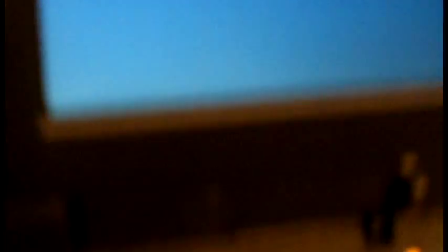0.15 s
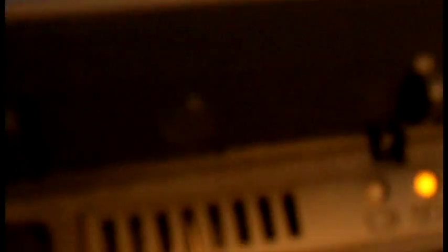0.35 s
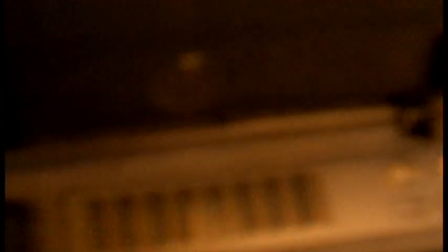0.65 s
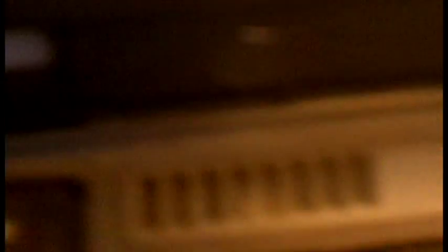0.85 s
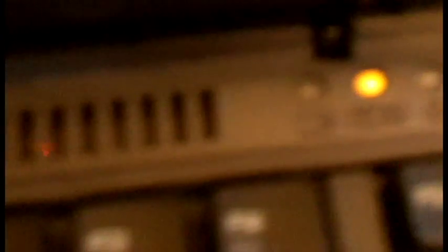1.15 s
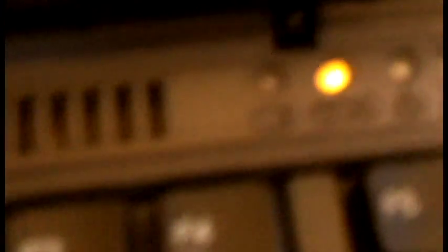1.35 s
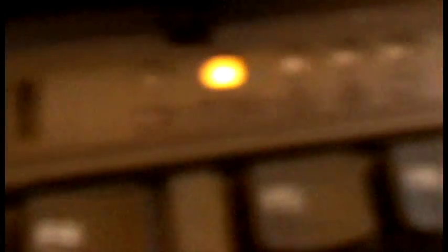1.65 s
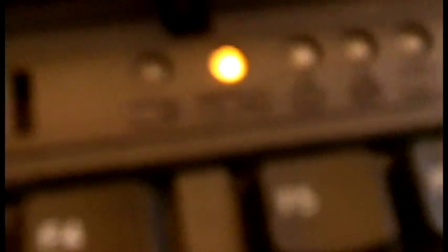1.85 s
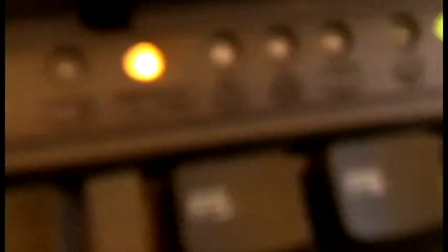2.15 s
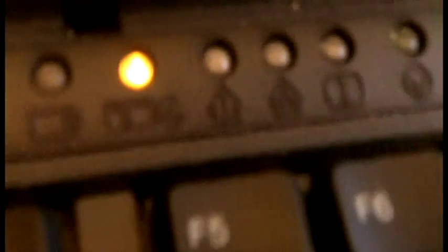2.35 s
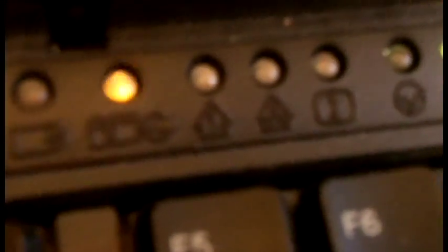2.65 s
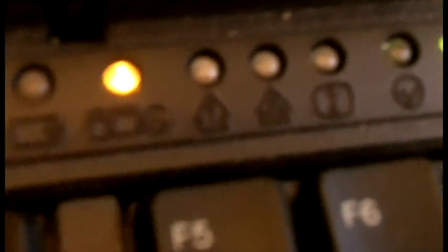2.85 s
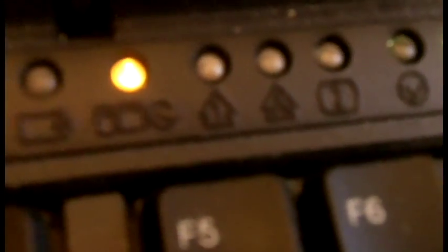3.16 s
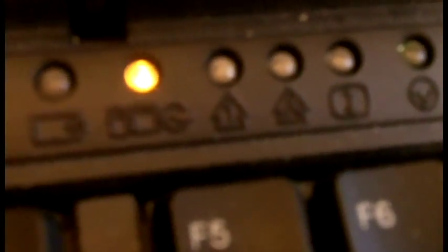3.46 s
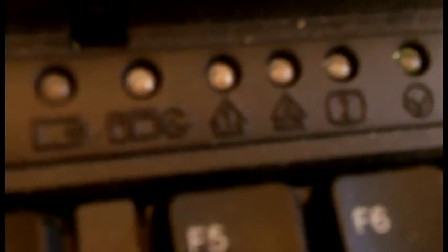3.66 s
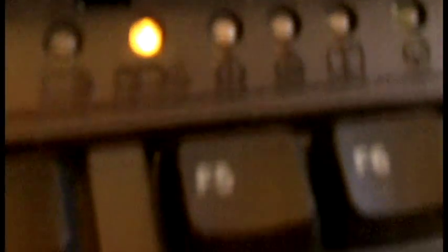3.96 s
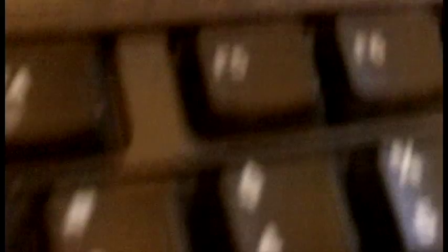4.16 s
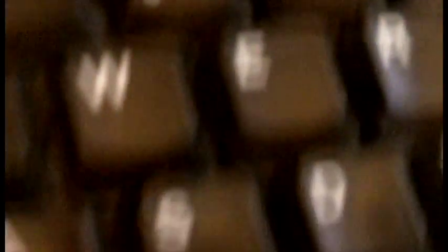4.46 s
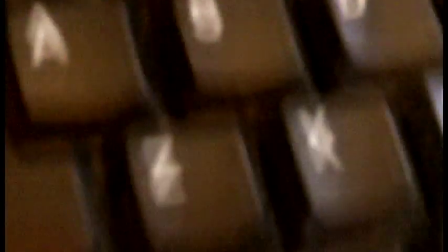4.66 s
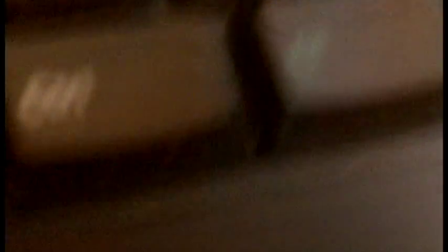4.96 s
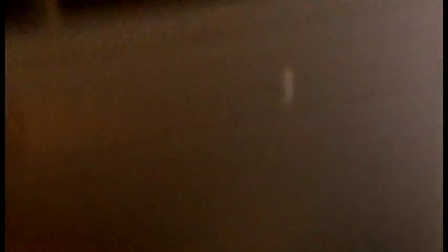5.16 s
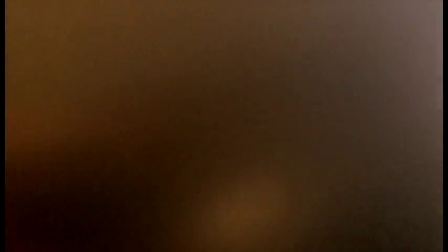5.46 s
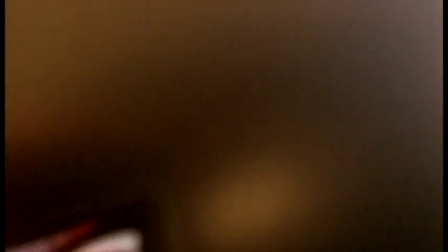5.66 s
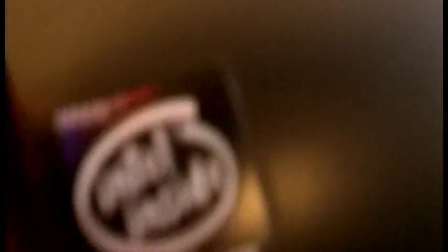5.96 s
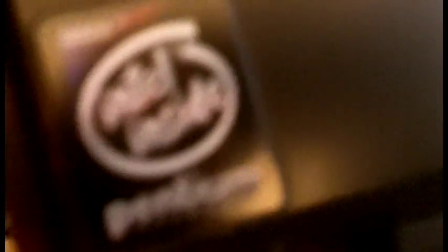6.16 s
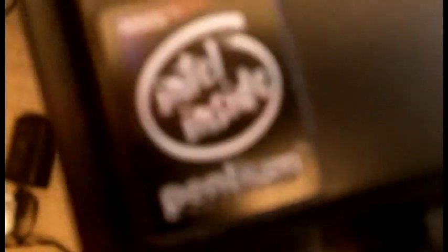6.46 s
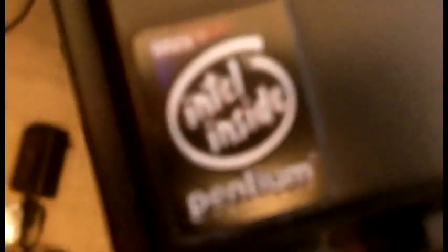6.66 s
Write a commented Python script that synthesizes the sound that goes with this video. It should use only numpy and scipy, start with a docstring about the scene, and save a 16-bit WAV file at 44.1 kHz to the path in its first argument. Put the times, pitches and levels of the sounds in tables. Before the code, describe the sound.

Close to a running laptop, a faint drive purrs and crackles over a steady low hum, interrupted by hand rubs and hard clicks of a plastic shell.

```python
"""Low handling rumble and a steady hum, as a small camera is carried close over a running laptop.
Its hard drive whirs on shaped noise and narrow motor lines, and seeks in bursts of quick irregular strokes:
jerks and a rough buzz that ring the cover. The hand rubs as gritty noise and snaps the camera's plastic shell
with short bursts into its resonances; faint high blips come from the electronics.
One microphone: its port cancels a narrow band, and its gain control ducks when the level passes a ceiling."""
import sys
import numpy as np
from scipy import signal
from scipy.fft import rfft, irfft, next_fast_len
from scipy.io import wavfile
from scipy.ndimage import uniform_filter1d, minimum_filter1d, map_coordinates

SR = 44100
rng = np.random.default_rng(int(sys.argv[2]) if len(sys.argv) > 2 else 0)


def dump(signal):
    """Clip the signal to [-1, 1] and save it as 16-bit WAV at the path in sys.argv[1]."""
    limited = np.clip(np.atleast_2d(signal).T, -1, 1)
    pcm = np.round(limited * 32767).astype(np.int16)
    wavfile.write(sys.argv[1], SR, pcm)


N = 300321

# The drive as it reaches the moving camera. Each row: time in seconds, whir level in dB, hum level in dB,
# stroke buzz level in dB, cover ring over the buzz in dB.
DRIVE_LEVELS = [(0, -78.5, -62.5, -80, 18), (.5, -76.5, -63.5, -78.5, 17.5), (.95, -74.5, -66, -70, -3),
                (1.4, -69.5, -61.5, -68.5, 5), (1.7, -68, -60.5, -65, 7), (2.35, -67.5, -58, -65, 6.5),
                (2.8, -68, -57.5, -66, 7), (3.3, -66, -57.5, -63.5, 9.5), (3.9, -66, -59.5, -65, 12),
                (4.6, -71, -61, -66, 4), (5.3, -71, -60.5, -67.5, 9), (5.7, -73, -59.5, -71, 11.5),
                (6.81, -74.5, -60, -71.5, 10)]


def amp(db):
    """Decibels to gain."""
    return 10 ** (np.asarray(db) / 20)


def unit(x):
    """x at rms 1."""
    return x / np.sqrt(np.mean(x ** 2) + 1e-20)


def curves(rows, outside=None):
    """One value per sample for each column after the time."""
    s, *cols = np.transpose(rows)
    return [np.interp(np.arange(N) / SR, s, c, outside, outside) for c in cols]


def wobble(rate):
    """A smooth random curve, rate knots a second."""
    knots = rng.standard_normal(int(N * rate / SR) + 4)
    return map_coordinates(knots, [np.arange(N) * rate / SR])


def filtered(x, response):
    """x times a complex response of frequency."""
    m = next_fast_len(N + SR // 2)
    return irfft(rfft(x, m) * response(np.fft.rfftfreq(m, 1 / SR)), m)[..., :N]


def noise(spectrum, grain_db=0.0):
    """Noise of rms 1 with a (Hz, dB) colour; grain swings its level fast and makes it gritty."""
    hz, db = np.transpose(spectrum)
    white = rng.standard_normal(N) * amp(grain_db * wobble(400))
    return unit(filtered(white, lambda f: amp(np.interp(np.log(f + 1), np.log(hz), db, -120, -120))))


def ringing(x, modes):
    """x through resonances of (Hz, width Hz, dB), scaled so that white noise keeps its power."""
    def response(f):
        total = 0
        for k, (centre, width, db) in enumerate(modes):
            mode = 1j * f * width / (centre * centre - f * f + 1j * f * width)
            # neighbours alternate in sign
            total = total + (-1) ** k * amp(db) * mode
        return total / np.sqrt(np.mean(abs(total) ** 2))
    return filtered(x, response)


def add(track, s, piece):
    """Mix a short piece in at time s."""
    part = track[round(s * SR):][:len(piece)]
    part += piece[:len(part)]


def lines(modes):
    """Narrow noise of rms 1; resonating twice keeps the valleys dark."""
    once = ringing(rng.standard_normal(N), modes)
    return unit(ringing(once, [(hz, 3 * width, 0) for hz, width, db in modes]))


def drive():
    """Platter whir, motor lines and a steady hum close by, with the room's air and a far hiss behind."""
    # Colour of the platter whir. Each row: frequency in Hz, relative level in dB per Hz.
    whir_colour = [(1200, -45), (1500, -8), (2100, -10.5), (2600, -6.5), (3700, -5), (5000, -4.5),
                   (5900, -9), (6350, -0.5), (7500, -2), (8300, -12.5), (10000, -26.5)]
    # High motor lines. Each row: frequency in Hz, width in Hz, relative level in dB.
    whines = [(2490, 15, -3), (4800, 20, -8), (5630, 24, -2), (6100, 30, -6), (6380, 32, -2),
              (7840, 37, -7.5), (11130, 110, -15), (12600, 22, -16)]
    # Colour of the room's air. Each row: frequency in Hz, relative level in dB per Hz.
    air_colour = [(90, -24.5), (140, -0.5), (300, -8.5), (500, -17.5), (760, -12.5), (1000, -17.5),
                  (1200, -12.5), (1500, -25.5), (3000, -38)]
    # Low motor lines. Each row: frequency in Hz, width in Hz, relative level in dB.
    drones = [(349.3, 6.8, -4), (765, 7.1, -0.5), (905, 8.6, 1), (1071, 8, -5)]
    # Colour of the far hiss. Each row: frequency in Hz, relative level in dB per Hz.
    hiss_colour = [(2000, -21.5), (6000, -2), (9000, -4), (12600, -3.5), (13200, -7), (15000, -13.5),
                   (16000, -19.5)]
    # The room's air. Each row: time in seconds, level in dB.
    room = [(0, -69), (.5, -72.5), (2.1, -64), (3, -63.5), (4.5, -67.5), (5.4, -67.5), (6.81, -72)]
    hum_hz = 120.2
    hiss_db, hiss_follows = -81, .7  # level at the mean air level; share of the air's swings in dB

    whir_db, hum_db = curves(DRIVE_LEVELS)[:2]
    air_db, = curves(room)
    t = np.arange(N) / SR
    whir_and_whines = noise(whir_colour, grain_db=2.5) + amp(-6.5) * lines(whines)
    whir = amp(whir_db + 1.1 * wobble(6.5)) * whir_and_whines
    air = amp(air_db + .8 * wobble(5)) * (noise(air_colour) + amp(-5.0) * lines(drones))
    # the hum's phase wanders slightly
    tone = np.sqrt(2) * np.sin(2 * np.pi * hum_hz * t + 0.24 * wobble(1.4))
    hum = amp(hum_db + 1.1 * wobble(10)) * tone
    hiss = amp(hiss_db + hiss_follows * (air_db - air_db.mean())) * noise(hiss_colour)
    return whir + hum + air + hiss


def hand():
    """Skin slides with a gritty hiss; slow shaking reaches the microphone as rumble."""
    # Skin slides on the shell. Each row: start in seconds, rise in seconds, length after the rise in seconds,
    # treble level in dB, body over treble in dB.
    rubs = [(0.031, 0.0039, 0.063, -61, -1.5), (.054, 0.058, 0.17, -67.5, 1.5),
            (0.213, 0.024, 0.1, -59, -4), (.428, 0.025, 0.11, -71.5, -12), (.763, 0.051, 0.073, -60.5, -9),
            (.857, .021, 0.051, -66.5, -6), (.945, 0.0056, 0.04, -67, -2.5),
            (.995, 0.0066, 0.051, -45.5, -13.5), (1.042, 0.011, 0.049, -65, -5),
            (1.418, 0.091, 0.049, -54.5, -15.5), (1.538, 0.017, 0.037, -58, -24),
            (1.668, .015, .033, -55, -12), (1.707, 0.04, 0.17, -66.5, -7), (1.998, .058, .18, -69.5, -19),
            (3.885, .012, .08, -62, -5), (3.949, 0.0018, 0.034, -35, -11)]
    # Treble colour of a slide. Each row: frequency in Hz, relative level in dB per Hz.
    skin_colour = [(3000, -31), (4300, -19), (5100, -12), (6800, -3), (8200, -7), (10000, -17),
                   (13700, -33.5), (16000, -50.5)]
    # Body colour of a slide. Each row: frequency in Hz, relative level in dB per Hz.
    palm_colour = [(150, -34), (300, -7), (1000, 3), (2200, -4), (3100, 0.5), (4000, -8), (5000, -58)]
    # The hand shakes the microphone. Each row: time in seconds, level in dB.
    shake = [(0, -55.5), (.8, -56.5), (1.1, -50.5), (1.6, -53), (1.72, -49.5), (1.85, -53), (2.4, -51.5),
             (3.6, -50.5), (4.5, -53), (5.8, -52), (6.55, -53.5), (6.81, -61.5)]
    # Colour of the shaking. Each row: frequency in Hz, relative level in dB per Hz.
    thud_colour = [(10, -31), (24, -0.5), (60, -7.5), (90, -18.5), (150, -34.5), (400, -62)]
    held = 0.53  # share of the length after the rise at full pressure

    treble, body = np.zeros(N), np.zeros(N)
    for s, rise, length, db, body_db in rubs:
        corners = np.cumsum([0, rise, held * length, (1 - held) * length])
        press = np.interp(np.arange(corners[-1] * SR) / SR, corners, [0, 1, 1, 0]) ** 2
        add(treble, s, amp(db) * press)
        add(body, s, amp(db + body_db) * press)
    skin = treble * noise(skin_colour, grain_db=2.5)
    palm = body * amp(2.65 * wobble(45)) * noise(palm_colour, grain_db=2.5)
    rumble = amp(curves(shake)[0] + 0.45 * wobble(6.6)) * noise(thud_colour)
    return skin + palm + rumble


def stroke_times():
    """Each burst spreads its strokes between its two ends, with uneven gaps."""
    # Bursts of head strokes. Each row: the two end strokes in seconds, number of strokes.
    bursts = [(.292, .316, 2), (1.318, 1.318, 1), (1.455, 1.455, 1), (1.5, 1.571, 4), (1.625, 1.732, 7),
              (1.76, 1.809, 4), (1.894, 1.944, 4), (1.984, 1.984, 1), (2.018, 2.077, 5), (2.103, 2.201, 5),
              (2.257, 2.335, 6), (2.46, 2.474, 2), (2.527, 2.543, 2), (2.592, 2.662, 5), (2.704, 2.804, 7),
              (2.854, 2.894, 3), (2.918, 3.032, 8), (3.065, 3.118, 5), (3.165, 3.265, 6), (3.297, 3.309, 2),
              (3.356, 3.434, 5), (3.573, 3.612, 3), (3.99, 4.022, 2), (4.062, 4.15, 5), (4.178, 4.253, 4),
              (4.29, 4.331, 4), (4.369, 4.369, 1), (4.427, 4, 2), (4.492, 4.492, 1), (4.543, 4.59, 4),
              (4.637, 4.721, 5), (4.761, 4.761, 1), (4.809, 4.934, 6), (4.96, 5.05, 7), (5.087, 5.097, 2),
              (5.135, 5.241, 6), (5.255, 5.326, 6), (5.346, 5.468, 9), (5.49, 5.561, 5), (5.612, 5.712, 5),
              (5.739, 5.834, 6), (5.869, 5.92, 3), (5.973, 5.973, 1), (6.029, 6.13, 6), (6.19, 6.241, 4),
              (6.28, 6.338, 4), (6.389, 6.432, 4), (6.456, 6.547, 5), (6.718, 6.738, 2), (6.789, 6.802, 2)]
    uneven = .2  # scatter of the gaps, as a share of the gap
    times = []
    for (first, last, strokes), chance in zip(bursts, rng.standard_normal((len(bursts), 20))):
        places = np.cumsum(np.exp(uneven * chance[:round(strokes)]))
        share = (places - places[0]) / (places[-1] - places[0] + 1e-9)
        times += list(first + (last - first) * share)
    return times


def seeks(stroke_s=.0075):
    """The arm jerks off, buzzes, sings downward as it slows and brakes; the braking kick rings the cover."""
    # The arm's resonances. Each row: frequency in Hz, width in Hz, relative level in dB.
    arm = [(1230, 150, -2), (1447, 170, -3), (2686, 200, -3.5), (2845, 220, -3), (3270, 230, -4.5),
           (3560, 130, -4.5), (3730, 84, -1.5)]
    # The laptop's case passes the buzz in bands. Each row: frequency in Hz, width in Hz, relative level in dB.
    case = [(1350, 900, 0), (2800, 550, 0), (3700, 450, 0)]
    # The drive cover's resonances. Each row: frequency in Hz, width in Hz, relative level in dB.
    cover = [(654, 4.1, -4), (769.3, 28, -10), (860.8, 24, 1.5), (1863, 30, -18)]
    glide_from_hz, glide_to_hz, glide_db = 1767, 960, -2  # level over the stroke buzz level

    buzz, kicks, sung = np.zeros(N), np.zeros(N), np.zeros(N)
    t = np.arange(900) / SR
    # after the stroke the buzz drops and dies 60 dB in 74 ms
    moving = np.where(t < stroke_s, .55, .22 * amp(-60 * (t - stroke_s) / 0.074))
    u = np.clip(t / stroke_s, 0, 1)
    glide_hz = glide_from_hz + (glide_to_hz - glide_from_hz) * u
    glide = np.sin(np.pi * u) * np.sin(2 * np.pi * np.cumsum(glide_hz) / SR)
    times = stroke_times()
    for s, fine in zip(times, rng.standard_normal((len(times), len(t)))):
        force = amp(2.2 * fine[0])
        add(buzz, s, force * moving * np.sign(fine))
        # jerk off, then brake
        add(buzz, s, force * np.array([14.0]))
        add(buzz, s + stroke_s * 0.53, force * np.array([-11.0]))
        add(sung, s, force * glide)
        # what reaches the cover: the kick and a little of the roughness
        add(kicks, s + stroke_s * .75, force * np.array([18.0]))
        add(kicks, s, .3 * force * moving * fine[::-1])
    buzz_db, ring_db = curves(DRIVE_LEVELS)[2:]
    through_case = ringing(ringing(buzz, arm), case)
    strokes = amp(buzz_db) * (amp(-6.0) * through_case + amp(glide_db) * sung)
    return strokes + amp(buzz_db + ring_db) * ringing(kicks, cover)


def shell():
    """Each snap is a short burst into the shell's modes; pressure jolts also push air at the port."""
    # The shell snaps. Each row: start in seconds, strike level in dB, body over treble in dB, body pitch in Hz.
    snaps = [(0.501, -52, -28, 2000), (.5423, -57, -23, 2000), (0.9486, -46.5, 9, 750),
             (1.276, -48, -14, 1870), (1.69, -37, -33, 1500), (1.7749, -48, -21, 2000),
             (1.8443, -42, -18, 2010), (1.863, -25, -6, 2450), (1.8665, -29, -20, 2500),
             (2.014, -50, -21, 2000), (2.108, -48, -28, 2000), (2.1238, -48, -23, 2000),
             (2.1407, -49, -25, 2000), (2.3776, -22.5, -8, 1580), (2.3858, -25, -2, 1290),
             (2.3893, -5.5, -17.5, 1750), (2.3936, -15, -13, 1443), (2.3953, -5, -14.5, 1750),
             (3.9033, -35.5, -19, 3090), (3.927, -35, -24.5, 2490), (3.9341, -33, -17, 2500),
             (3.937, -36, -10, 2500), (3.955, -22, -16, 3300), (3.96, -21, -14, 2870),
             (3.9667, -37, -5.5, 3000), (3.973, -25, -19, 3030), (4.14, -17.5, -29.5, 2000),
             (4.703, -47, -16.5, 2000), (4.8272, -15.5, -20, 1690), (4.9246, -46.5, -32, 2000),
             (5.3113, -66, 13, 650), (5.324, -49, -11.5, 2000), (5.897, -56.5, -16.5, 1990)]
    # The shell's treble modes. Each row: frequency in Hz, width in Hz, relative level in dB.
    high_modes = [(5260, 710, -12.5), (6800, 1470, 8), (8000, 44, -10), (7700, 73, 0), (9600, 4500, -5),
                  (11200, 1300, -14.5), (14510, 2100, -8.5)]
    # The shell's body modes. Each row: frequency in Hz, width in Hz, relative level in dB.
    low_modes = [(277, 140, 2.5), (600, 180, -1), (1023, 130, -0.5), (1468, 230, -3.5), (2090, 540, -3.5),
                 (2430, 500, -4.5), (3630, 500, -0.5)]
    # Pressure jolts on the port. Each row: start in seconds, level in dB, suck time in seconds,
    # swing back over the suck in dB, swing time in seconds.
    pushes = [(0.9491, -26.5, 0.0011, -8, 0.011), (2.391, -19, .0015, -7, 0.0024),
              (4.8274, -24, 0.0054, -9, .018)]
    burst_cycles = 12.5  # a burst dies 60 dB in this many cycles of its body pitch

    high, low, port = np.zeros(N), np.zeros(N), np.zeros(N)
    t = np.arange(4000) / SR
    short = t[:900]
    grit = rng.standard_normal((len(snaps), 2, len(short)))
    # one clean blow opens each burst
    blow = 1.5 * np.exp(-.5 * ((short - .0004) / .00003) ** 2)
    for (s, db, body_db, body_hz), (fine, coarse) in zip(snaps, grit):
        burst = amp(-60 * short * body_hz / burst_cycles) * (1 - np.exp(-short / 0.001))
        # a harder snap has a shorter contact and so more top
        top = signal.butter(4, np.clip(18001.0 + 600 * db, 9500, 16000), fs=SR)
        treble = signal.lfilter(*top, blow + 0.77 * burst * np.sign(fine))
        add(high, s, amp(db + 3.5) * treble)
        band = signal.butter(2, [body_hz * .55, body_hz * 1.8], "bandpass", fs=SR)
        body = signal.lfilter(*band, 1.1 * burst * np.sign(coarse) - blow)
        add(low, s, amp(db + body_db + 10) * body)
    for s, db, suck, swing_db, swing in pushes:
        # a sudden suck, then a slow swing back
        back = amp(swing_db) * np.e * t / swing * np.exp(-t / swing) * np.cos(t / swing)
        onset = 1 - np.exp(-t / 0.00024)
        add(port, s, amp(db) * onset * (back - np.exp(-t / suck)))
    return ringing(high, high_modes) + ringing(low, low_modes) + port


def whistles():
    """Faint high blips of the electronics: short sines with a rounded envelope."""
    # Each row: start in seconds, level in dB.
    blips = [(2.077, -71), (2.169, -69), (2.873, -64), (3.2877, -61.5), (3.3235, -62), (3.485, -64),
             (3.521, -61), (3.982, -64)]
    blip_hz, blip_s = 11200, 0.01
    out, t = np.zeros(N), np.arange(round(blip_s * SR)) / SR
    blip = np.sqrt(np.hanning(len(t))) * np.sin(2 * np.pi * blip_hz * t)
    for s, db in blips:
        add(out, s, amp(db) * blip)
    return out


def ducking(x):
    """Gain in dB: drops just after the level passes the ceiling, holds, then creeps back."""
    ceiling_db, sense_s, react_s, hold_s, recover_s = -31, 0.027, .025, 1.397, 0.34
    power = uniform_filter1d(np.mean(x ** 2, axis=0), round(sense_s * SR))
    level_db = 10 * np.log10(abs(power) + 1e-12)
    # the delay lets the centred minimum start only after the reaction time
    delay = round((react_s + hold_s / 2) * SR)
    need = np.pad(np.minimum(0, ceiling_db - level_db), (delay, 0))
    held = minimum_filter1d(need, round(hold_s * SR))[:N]
    keep = np.exp(-1 / (recover_s * SR))
    return np.minimum(held, signal.lfilter([1 - keep], [1, -keep], held))


def scene():
    """One microphone feeds both channels, the right a shade stronger; some noise and bass flicker differ."""
    mono = drive() + hand() + seeks() + shell() + whistles()
    # Noise opposite in the two channels. Each row: frequency in Hz, relative level in dB per Hz.
    side_colour = [(15, 0.0), (130, -11.0), (300, -20.5), (1000, -27.5),
                   (4000, -36.0), (7000, -33.5), (10500, -29.5)]
    side_noise = amp(-79.5) * noise(side_colour)
    bass = filtered(mono, lambda f: 1 / (1 + 1j * f / 600))
    apart = side_noise - amp(-40.0) * mono + amp(-30) * wobble(40) * bass
    return np.array([mono + apart, mono - apart])


def record(dry):
    """The port cancels a narrow band, the gain ducks, the loudest peaks round off, the top is cut."""
    port_hz, top_hz = 4250, 16100

    def port(f):
        tuned = port_hz ** 2 - f * f
        return (tuned + 1j * f * 60) / (tuned + 1j * f * 1100)

    heard = filtered(dry, port)
    heard = heard * amp(ducking(heard))
    rounded = heard / (1 + abs(heard / .56) ** 4) ** (1 / 4)
    return filtered(rounded, lambda f: f < top_hz)


dry = scene()
out = record(dry)
dump(out)
```